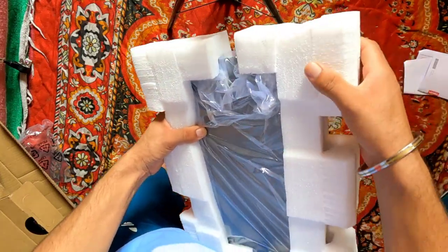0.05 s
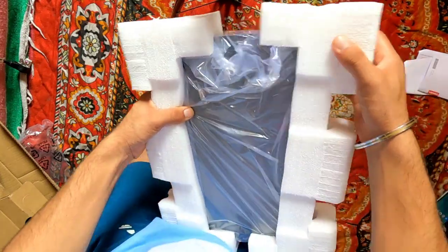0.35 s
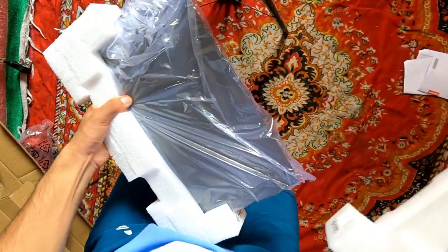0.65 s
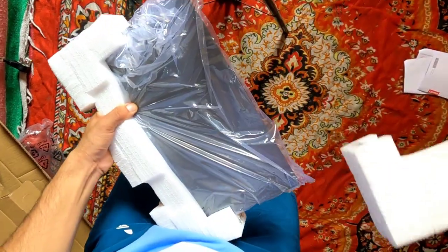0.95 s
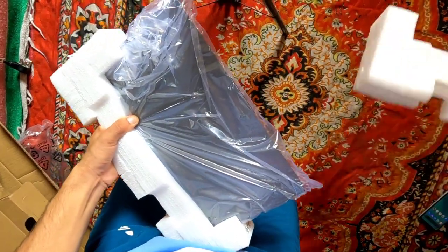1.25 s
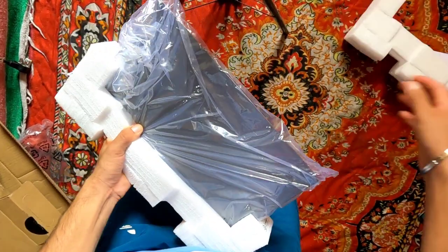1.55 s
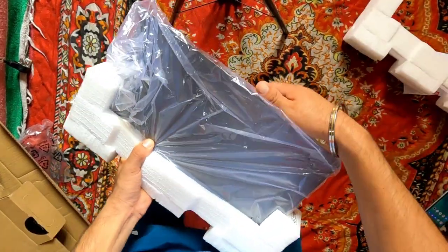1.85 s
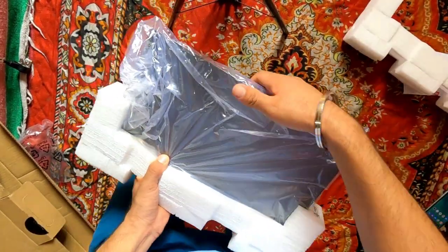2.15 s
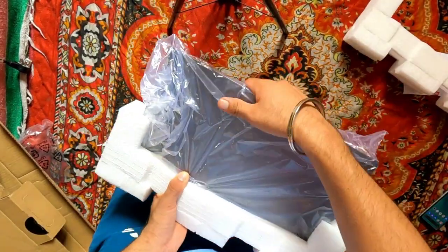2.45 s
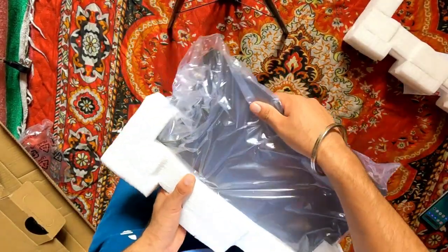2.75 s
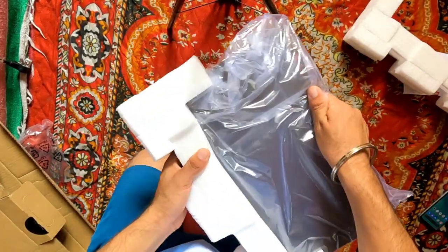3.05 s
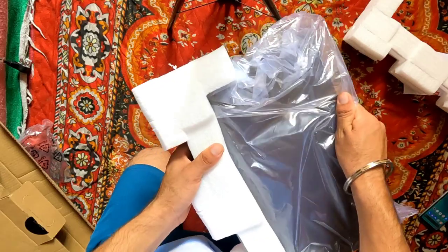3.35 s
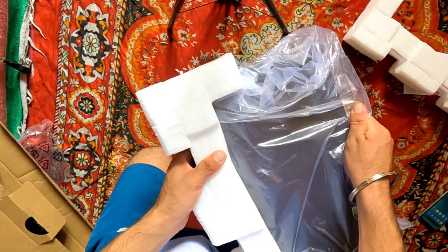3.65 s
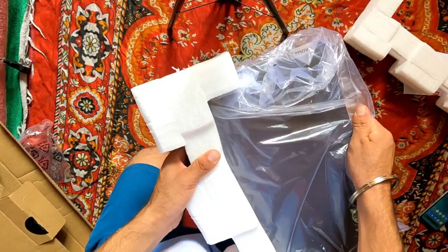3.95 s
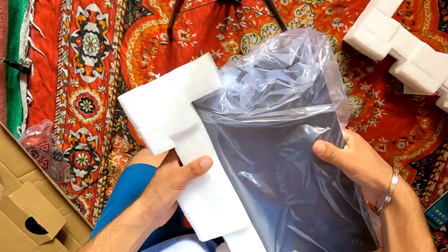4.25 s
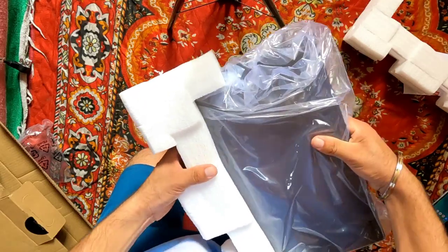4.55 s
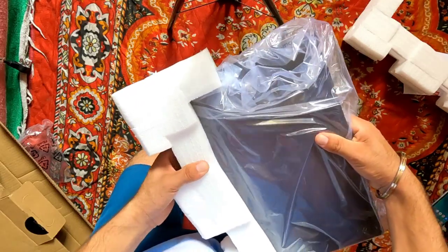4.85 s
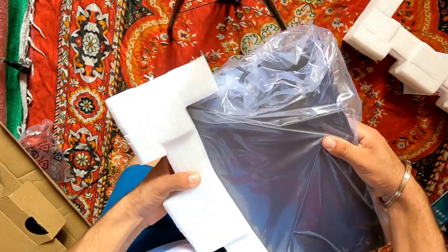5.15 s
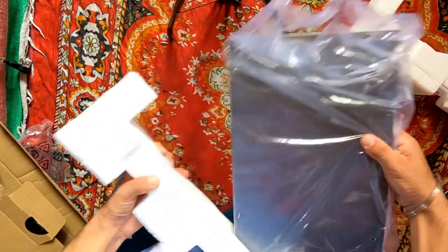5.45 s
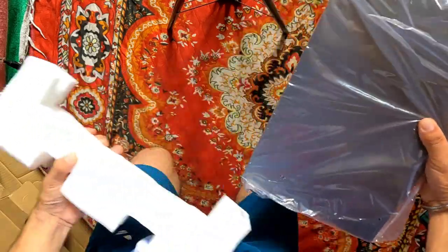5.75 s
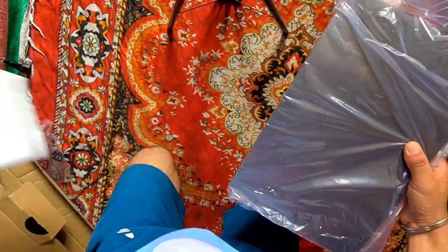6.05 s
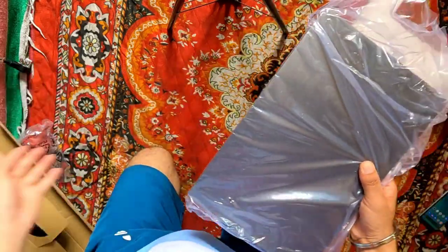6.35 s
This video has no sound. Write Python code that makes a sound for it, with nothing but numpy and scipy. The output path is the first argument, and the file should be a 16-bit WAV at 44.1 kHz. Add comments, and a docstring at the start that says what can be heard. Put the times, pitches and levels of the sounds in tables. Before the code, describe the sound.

A bagged item is worked out of its foam end caps near the microphone, indoors. Rasping foam and a burst of crinkling plastic come first, then the light, hollow thump of one cap falling. Several seconds of uneven tugging follow, with the plastic rustling and its creases popping one by one. The crackle thins, the foam squeaks briefly, and the other cap knocks down. A faint low rumble runs underneath.

```python
"""A flat device in a plastic bag is worked out of its foam end caps, close up in a carpeted room.
Over a faint rumble of moving arms, the foam scrapes and squeaks and the first creases of the film snap.
At 1.6 s one cap drops with a hollow knock. From 2 s the bag is tugged again and again: large creases
buckle one by one over a fine crinkle, then thin out. The foam squeaks as it slides off, and the second
cap lands at 6.45 s, right at the end."""
import sys
import numpy as np
from scipy import signal
from scipy.fft import rfft, irfft
from scipy.io import wavfile

SR = 44100
rng = np.random.default_rng(int(sys.argv[2]) if len(sys.argv) > 2 else 0)


def log_audio(samples):
    """Write samples as a 16-bit WAV file to the path given in sys.argv[1]."""
    # one column per channel
    frames = np.atleast_2d(samples).T
    # limit to full scale, then quantise
    limited = np.clip(frames, -1, 1)
    pcm = np.round(limited * 32767).astype(np.int16)
    wavfile.write(sys.argv[1], SR, pcm)


N = 286914
TIME = np.arange(N) / SR
USUAL_EFFORT_DB = -40  # the film level at which creases come at their usual rate


def amp(db):
    """Decibels to gain."""
    return 10 ** (np.asarray(db) / 20)


def unit(x):
    """Scales to rms 1."""
    return x / np.sqrt(np.mean(x ** 2) + 1e-20)


def read(points, hz):
    """Reads a curve on a log-frequency axis."""
    f, value = np.transpose(points)
    return np.interp(np.log(hz + 1), np.log(f), value)


def follow(rows, column=1):
    """One column of an automation curve at every sample."""
    rows = np.array(rows)
    return np.interp(TIME, rows[:, 0], rows[:, column])


def add(mix, s, sound):
    """Mixes a sound in at s seconds."""
    part = mix[..., max(round(s * SR), 0):][..., :sound.shape[-1]]
    part += sound[..., :part.shape[-1]]


def colour(x, points):
    """Equalises a signal with a curve of f/Hz, gain/dB."""
    return irfft(rfft(x) * amp(read(points, np.fft.rfftfreq(N, 1 / SR))), N)


def wander(hz):
    """Random modulation of rms 1, rolling off above hz."""
    spectrum = rfft(rng.standard_normal(N))
    return unit(irfft(spectrum / (1 + (np.fft.rfftfreq(N, 1 / SR) / hz) ** 4), N))


def causal(gain_db, size):
    """The most compact (minimum-phase) pulse that has this spectrum."""
    cepstrum = irfft(np.log(amp(np.maximum(gain_db, -100))), size)
    cepstrum[1:size // 2] *= 2
    cepstrum[size // 2 + 1:] = 0
    return irfft(np.exp(rfft(cepstrum)), size)


def widen(pair):
    """Blends two unrelated signals into what two close microphone ports hear."""
    # left-right likeness of diffuse sound: f/Hz, coherence/0-1
    coherence = [(50, .95), (300, 0.97), (700, 0.83), (3000, 0.64), (8000, 0.62), (14000, 1)]
    size = pair.shape[-1]
    same = np.clip(read(coherence, np.fft.rfftfreq(size, 1 / SR)), 0, 1)
    mid, side = rfft(pair) * np.sqrt([(1 + same) / 2, (1 - same) / 2])
    return irfft(np.array([mid + side, mid - side]), size)


def noise(points):
    """Coloured stereo noise of rms 1."""
    return unit(colour(widen(rng.standard_normal((2, N))), points))


def background(rumble_db=-2.5, lumps_db=2.5, lumps_hz=6, drone_hz=81, drone_db=-60, waver_db=4.5,
               room_tone_db=-54):
    """Lumpy rumble of moving arms, a wavering low drone that swells now and then, and room tone."""
    # the arms' movement: t/s, level/dB
    arm_motion = [(0, -42.5), (.4, -46), (.8, -43.5), (1.2, -50.5), (1.7, -49), (2.3, -48), (3.3, -51),
                  (3.8, -44.5), (4.1, -52.5), (5, -46.5), (5.85, -51.5), (6, -47), (6.25, -46), (6.5, -36)]
    # spectrum of the rumble: f/Hz, relative level/dB
    rumble_spectrum = [(12, -23), (29, 3), (42, -8), (60, -1.5), (95, -12), (180, -12), (400, -30.5),
                       (1500, -73)]
    # spectrum of the room tone: f/Hz, relative level/dB
    room_tone = [(20, -18), (70, -17), (100, -26), (125, 8.5), (165, -5), (215, 4), (430, -3), (600, -22),
                 (1000, -24), (2200, -48), (5000, -36), (12000, -57)]
    # swells of the drone: middle t/s, half length/s, level/dB
    drone_swells = [(0.274, 0.091, -48), (.78, .08, -48.5), (2.48, 0.036, -46.5), (2.865, 0.099, -45),
                    (4.928, 0.089, -49.5)]
    drone = np.sqrt(2) * np.sin(2 * np.pi * np.cumsum(drone_hz + 3.44 * wander(20.4)) / SR)
    swells = sum(amp(db) / (1 + ((TIME - s) / half) ** 4) for s, half, db in drone_swells)
    rumble = noise(rumble_spectrum) * amp(follow(arm_motion) + rumble_db + lumps_db * wander(lumps_hz))
    drone_gain = np.hypot(swells, amp(drone_db + waver_db * wander(3.6)))
    return rumble + drone * drone_gain + amp(room_tone_db) * noise(room_tone)


def room(x, gap_s=0.0029, build_s=0.0042, size=22050):
    """A few wall echoes over a tail of sparse reflections whose bands die at their own speed."""
    # reverb time: f/Hz, t60/s
    decay = [(100, 3), (250, 1.16), (660, 0.68), (1700, 0.44), (4600, 0.44), (12000, 0.48)]
    # early reflections: delay/s, level/dB
    echoes = [(.0098, -36), (0.012, -13.5), (0.024, -14), (.0245, -30), (.0375, -10), (0.0547, -29)]
    # reverb colour, the carpet soaking up the treble: f/Hz, gain/dB
    reverb_eq = [(100, -10), (260, -4.5), (1500, -3), (5000, -4), (8000, -7.5), (14000, -9.5)]
    taps = rng.choice([-1., 1.], (2, size)) * (rng.random((2, size)) < .12)
    hz, t, bands = signal.stft(taps, SR, nperseg=256)
    bands = bands * amp(-60 * t / read(decay, hz)[:, None])
    tail = signal.istft(bands, SR, nperseg=256)[1][:, :size]
    tail = widen(tail * np.clip((TIME[:size] - gap_s) / build_s, 0, 1))
    tail /= np.linalg.norm(tail[0])
    for s, db in echoes:
        add(tail, s, amp([db]))
    return colour(signal.oaconvolve(x, tail, axes=1)[:, :N], reverb_eq)


def tug(start, length, release, attack_s=.008, attack_share=.2, sag_db_per_s=6):
    """Power envelope of one tug: it builds up, eases as the film gives way, and dies out."""
    t = np.maximum(TIME - start, 0)
    attack = np.minimum(t / (attack_s + attack_share * length), 1)
    return (attack * amp(-sag_db_per_s * t - 60 * np.maximum(t - length, 0) / release)) ** 2


def hands(tug_sliding_share=0.3):
    """Shifting and tugs add up in power: gives film dB, its tilt dB, its sliding share and foam dB."""
    # bag and foam shifting in the hands all the while: t/s, film/dB, treble tilt/dB, foam/dB
    shifting = [(0, -64.5, 0, -45), (.38, -50, -2, -46), (.58, -29.5, 8, -33.5), (.72, -40, 1, -39.5),
                (.87, -46.5, -9, -50), (1.2, -60, -14, -57), (1.58, -55.5, 2, -53.5), (1.9, -53, 0, -52.5),
                (2.05, -43.5, 1.5, -45), (2.52, -43.5, -12, -54), (2.72, -50.5, -5, -51),
                (3.17, -40.5, -1, -47), (3.38, -52.5, -15, -57), (3.85, -46.5, -2, -50.5),
                (4.3, -49, 14, -48.5), (4.6, -44.5, 1, -48), (4.92, -52, -12, -53.5), (5.36, -45, -1, -47),
                (5.7, -39, -20, -38), (5.93, -39, 1.5, -49.5), (6.1, -51.5, -7, -52.5),
                (6.44, -53, -17, -55)]
    # smooth sliding as against crackling while they shift: t/s, share of power/0-1
    sliding_share = [(0, 1), (.5, 0.2), (1, 0.82), (1.8, 0.96), (2.1, 0.36), (4.2, 0), (5.25, 0.63),
                     (5.55, 0.15), (5.9, 0.7), (6.4, 0.9)]
    # tugs, grabs and skids: t/s, length/s, release t60/s, film/dB, treble tilt/dB, foam/dB
    tugs = [(0.011, 0.068, 0.064, -38, 12, -41), (0.44, 0.092, .1, -42.5, -11, -66),
            (0.507, 0.08, 0.061, -22, -2.5, -34), (.695, 0.056, 0.16, -30, 3, -36),
            (1.37, 0.03, 0.13, -56, -22, -49), (1.625, 0.027, 1, -44.5, -7, -35),
            (1.916, 0.087, 0.047, -32, -3, -41), (2.105, 0.039, .1, -43, -21, -47),
            (2.372, .1, 0.41, -35, -2, -41.5), (2.817, 0.026, 0.11, -40, 5, -52),
            (2.991, 0.07, .1, -39, 4, -48), (3.068, 0.022, 0.085, -33, -11, -49),
            (3.564, 0.047, 0.13, -43.5, -2, -53), (3.662, 0.024, 0.066, -39.5, -4, -55),
            (3.757, 0.027, 0.22, -31, 8, -36), (4.055, 0.019, 0.047, -34.5, 1, -62),
            (4.206, .16, 0.62, -32.5, -1, -39), (4.413, .12, 0.14, -35.5, 8, -44),
            (5.06, 0.097, 0.11, -42, -4, -49), (5.178, 0.099, 0.17, -40.5, 0, -45),
            (5.379, 0.13, 0.33, -33.5, -5.5, -38), (5.464, 0.22, 0.35, -30.5, 8, -37.5),
            (6.192, 0.046, 0.11, -44.5, -11, -50), (6.333, 0.02, 0.045, -41, 13, -58)]
    film, foam = amp(follow(shifting)) ** 2, amp(follow(shifting, column=3)) ** 2
    tilt, sliding = film * follow(shifting, column=2), film * follow(sliding_share)
    for start, length, release, film_db, tilt_db, foam_db in tugs:
        envelope = tug(start, length, release)
        pull = envelope * amp(film_db) ** 2
        film += pull
        foam += envelope * amp(foam_db) ** 2
        tilt += pull * tilt_db
        sliding += pull * tug_sliding_share
    return 10 * np.log10(film), tilt / film, np.clip(sliding / film, 0, 1), 10 * np.log10(foam)


def scrape(foam_db, level_db=-0.5, judder_db=2.5, judder_hz=135):
    """Foam cells catch and let go, and the light block radiates the judder as a low rasp."""
    # spectrum of rubbed foam: f/Hz, relative level/dB
    rasp = [(90, -12.5), (170, -3.5), (230, -3), (296, 2), (400, -3), (490, -3), (576, 0), (730, -6.5),
            (950, -3), (1290, -4), (1800, -12.5), (3000, -15), (9000, -21.5)]
    return noise(rasp) * amp(level_db + foam_db + judder_db * wander(judder_hz))


def squeaks(jitter=0.123, roughness=0.76, overtone_db=-14):
    """Foam sticks and slips under the fingers in short runs of unsteady pitch."""
    # the slips: t/s, length/s, level/dB, f/Hz
    slips = [(0.026, 0.024, -30, 1450), (.072, .015, -42, 1463), (0.501, 0.0095, -30, 1495),
             (1.381, 0.041, -52, 1733), (2.126, .02, -40, 1715), (2.437, 0.026, -32.5, 1755),
             (5.83, .13, -44, 1657), (6.043, 0.017, -48, 1274), (6.22, 0.023, -37, 2150),
             (6.223, 0.043, -41.5, 1188), (6.339, 0.028, -42.5, 1646), (6.34, 0.025, -52.5, 3230)]
    out, drift, grip = np.zeros(N), wander(575), wander(127)
    for s, length, db, hz in slips:
        progress = (TIME - s) / length
        on = (progress > 0) & (progress < 2)
        phase = 2 * np.pi * np.cumsum(hz * (1 + jitter * drift[on])) / SR
        tone = np.sin(phase) + amp(overtone_db) * np.sin(2 * phase)
        swell = np.minimum(progress[on] / .15, 1) / (1 + progress[on] ** 8)
        out[on] += amp(db) * swell * (1 + roughness * grip[on]) * tone
    return out


def snap(hz, octaves, flutter=.26, flutter_s=0.0018, skirt=3.8, tick_db=-17, tick_hz=1100,
         stereo_width=0.29, spread_s=0.0003, size=512):
    """A crease flips: a bare tick and a few cycles of ring, then ripples running through the sheet."""
    t, f = np.arange(size) / SR, np.fft.rfftfreq(size, 1 / SR) + 20
    ring = (1 + (np.log2(f / hz) / max(octaves, .15)) ** 2 / skirt) ** -skirt * 2 / (1 + f / hz)
    tick = amp(2 * tick_db) / (1 + (tick_hz / f) ** 4)
    pulse = rfft(causal(10 * np.log10(ring + tick), size))
    ripples = rng.standard_normal((3, size)) * np.exp(-t / flutter_s) * flutter / 2
    paths = ripples[0] + stereo_width * ripples[1:]
    paths[:, 0] = 1  # the direct path
    delay_s = spread_s * np.sqrt(3000 / (f + 200))  # low bending waves cross the sheet later
    dispersion = np.exp(-2j * np.pi * np.cumsum(delay_s) * SR / size)
    sound = irfft(pulse * rfft(paths) * dispersion, size)
    return unit(sound) * np.sqrt(SR / 1000 / size)  # the energy of 1 ms at rms 1


def knocks(size=16384):
    """A dropped cap thumps on the floor, rings hollow and cracks at its edge: gives dry and room send."""
    # blows of the falling caps: t/s, thump level/dB, thump f/Hz, thump t60/s, ring level/dB,
    # crack level/dB, crack f/Hz, crack bandwidth/octaves, room send/dB
    blows = [(1.5991, -25, 276, 0.033, -52, -20.5, 2320, 1, -0.5),
             (1.643, -14.5, 236, 0.036, -27, -20, 1480, 0.61, -2),
             (1.6465, -16, 820, 0.014, -24.5, -15.5, 4500, 0.3, -5),
             (6.4505, -16, 950, 0.017, -33, -22, 1180, 0.37, -5),
             (6.4566, -16, 121, 0.1, -54, -26.5, 4850, 0.38, 5.5),
             (6.4573, -18.5, 457, 0.029, -32, -21, 1180, 0.54, 0.5),
             (6.464, -14.5, 225, 0.11, -35, -26.5, 1380, 0.86, 1.5)]
    # modes of a foam cap: f/Hz, level/dB, t60/s
    cap_modes = [(168, -24, 0.25), (218, 2.5, 0.23), (282.7, 2, 0.15), (313, -7, 0.14), (368.4, 1, 0.13),
                 (445, -11, 0.12), (575, -20, .1), (787, -3, 0.12), (1024, -8, 0.1), (1108, -2, 0.13),
                 (1340, -8, 0.052), (1520, -4, 0.06)]
    t, near, send = np.arange(size) / SR, np.zeros((2, N)), np.zeros((2, N))
    ring = sum(amp(db - 60 * t / t60) * np.sin(2 * np.pi * hz * t) * (-1) ** k
               for k, (hz, db, t60) in enumerate(cap_modes)) / 2
    for s, thump_db, thump_hz, t60, ring_db, crack_db, crack_hz, octaves, send_db in blows:
        thump = amp(thump_db - 60 * t / t60) * np.sin(2 * np.pi * thump_hz * t)
        crack = snap(crack_hz, octaves, flutter=1.0, flutter_s=0.003, tick_db=-19.5)
        blow = np.tile(thump + amp(ring_db) * ring, (2, 1))
        add(blow, 0, amp(crack_db) * crack)
        add(near, s, blow)
        add(send, s, amp(send_db) * blow)
    return near, send


def crinkle(effort_db, tilt_db, sliding, per_s=550, size_db=3.5, largest=2.38, clump_db=1.0,
            level_db=-1, octaves=0.4, hinge_hz=3200, pitches=36):
    """Countless small creases, faster when the film is worked harder, over the hiss of sliding film."""
    # spectrum of sliding film: f/Hz, relative level/dB
    hiss = [(150, -30), (500, -37), (900, 0), (1400, 8), (2400, 5), (4000, 3), (6000, -2), (9000, -2),
            (14000, -5.5)]
    # colour of the small creases: f/Hz, gain/dB
    grain_eq = [(200, 31), (900, -8.5), (1600, 2.0), (2600, -3.0), (5000, 0.0), (12000, -2.5)]
    rate = per_s * amp(.5 * (effort_db - USUAL_EFFORT_DB))
    sizes = amp(size_db * np.minimum(rng.exponential(1, N), largest)) * rng.choice([-1, 1], N)
    fires, pitch_index = rng.random(N) < rate / SR, rng.integers(0, pitches, N)
    clicks = sizes * fires / np.sqrt(rate)  # equal power at any rate
    grains = np.zeros((2, N))
    for k, hz in enumerate(np.geomspace(1200, 7000, pitches)):
        grains += signal.oaconvolve((clicks * (pitch_index == k))[None], snap(hz, octaves), axes=1)[:, :N]
    grains = unit(colour(grains, grain_eq))
    film = np.sqrt(1 - sliding) * grains + np.sqrt(sliding) * noise(hiss)
    # taut film sounds bright, slack film dull, at about equal power
    dull = signal.filtfilt(*signal.butter(1, hinge_hz, fs=SR), film)
    film = (dull + (film - dull) * amp(tilt_db)) / np.sqrt((1 + amp(2 * tilt_db)) / 2)
    return film * amp(level_db + effort_db + clump_db * wander(hz=35))


def creases(effort_db, sliding, per_s=26, lesser_db=-30.5, spread_db=2.0, growth=.6, centre_hz=3100,
            pitch_spread=0.31, lesser_octaves=0.64, right_db=.5, tries=500):
    """Large creases buckle one by one, and lesser ones by chance where film is crushed, not slid."""
    # the large creases: t/s, level over a millisecond/dB, centre f/Hz, bandwidth/octaves
    buckles = [(.4382, -27.5, 3420, 1), (.5247, -22.5, 2100, 1.6), (.6833, -19, 3850, 1),
               (.7123, -18.5, 4000, 0.41), (1.066, -35, 3610, 0.74), (1.0872, -30.5, 2800, 0.79),
               (1.9533, -21.5, 3320, .44), (1.9655, -18, 1930, .34), (2.1714, -27, 1930, .43),
               (2.2943, -26, 2470, 1), (2.4658, -17, 4240, 0.36), (2.5434, -18.5, 3280, 0.89),
               (2.7695, -29.5, 5900, 1.3), (2.8381, -25.5, 3200, .22), (2.8542, -24, 2540, 0.31),
               (2.8587, -20.5, 3460, 1.2), (2.955, -19.5, 4180, 0.87), (3.0771, -21.5, 2920, .87),
               (3.0842, -17, 4200, 0.24), (3.095, -19, 4030, 1.3), (3.1107, -23.5, 3100, 1.4),
               (3.186, -20, 3540, 0.28), (3.2273, -23.5, 3200, .5), (3.303, -23.5, 3820, 1.4),
               (3.358, -21.5, 4560, .94), (3.3807, -22, 2800, 0.43), (3.4199, -21, 3230, 0.86),
               (3.5081, -32, 2720, 0.59), (3.5852, -26.5, 3280, 0.74), (3.709, -24, 3900, 1.3),
               (3.7413, -21, 2940, 1.1), (3.7662, -22, 3200, 1.2), (3.7754, -15, 3840, 1.4),
               (3.799, -20, 2620, 1.06), (3.8602, -18, 3460, 1.6), (3.91, -18.5, 6500, 0.21),
               (3.9129, -22.5, 1610, 1.2), (3.963, -27.5, 2630, .47), (3.9843, -22.5, 4330, 1.6),
               (4.0074, -25.5, 3660, .35), (4.0669, -25.5, 3630, 1.3), (4.0858, -19.5, 7250, 0.24),
               (4.1328, -23, 2240, 0.69), (4.1727, -27.5, 2030, 1.6), (4.2103, -25, 4600, 0.7),
               (4.2333, -21, 4940, 1.4), (4.2671, -18.5, 3100, 1.1), (4.3406, -22, 3250, 0.64),
               (4.397, -16, 5270, .7), (4.5323, -21.5, 4070, 0.7), (4.6, -26, 2780, 1.1),
               (4.7026, -26.5, 3400, 0.99), (4.7391, -26, 3600, 0.47), (4.7659, -24.5, 4170, 0.52),
               (4.8279, -25, 3460, 0.89), (4.8489, -29, 3140, 0.62), (4.9247, -33.5, 2850, 0.7),
               (5.009, -28, 3430, 1.6), (5.0662, -27, 2210, 0.38), (5.1087, -25.5, 3930, 0.45),
               (5.2382, -21, 5300, 1.3), (5.4448, -19, 3120, 0.38), (5.5782, -18.5, 3830, .23),
               (5.6662, -21, 4400, 1.7), (5.7913, -24.5, 1950, 2.4)]
    out = np.zeros((2, N))
    for s, db, hz, octaves in buckles:
        add(out, s, amp(db) * snap(hz, octaves))
    for (place, chance), (size, pitch) in zip(rng.random((tries, 2)), rng.standard_normal((tries, 2))):
        at = int(place * N)
        push_db = growth * (effort_db[at] - USUAL_EFFORT_DB)
        rate = per_s * (1 - sliding[at]) * amp(push_db / 2)
        sound = snap(centre_hz * np.exp(pitch_spread * pitch), lesser_octaves)
        if chance < rate * N / SR / tries:
            add(out, at / SR, amp(lesser_db + push_db + spread_db * size) * sound)
    return out * amp([[-right_db], [right_db]])  # the bag sits a little to the right


def scene(handled_send_db=-7, snap_send_db=-7):
    """Bag and foam in the hands, the dropped caps, and the room round them."""
    effort_db, tilt_db, sliding, foam_db = hands()
    handled = crinkle(effort_db, tilt_db, sliding) + squeaks()
    snaps = creases(effort_db, sliding)
    caps, caps_send = knocks()
    reverb = room(amp(handled_send_db) * handled + amp(snap_send_db) * snaps + caps_send)
    return handled + snaps + scrape(foam_db) + caps + reverb + background()


def record(dry, size=1024, edge_hz=16300):
    """Two close ports, the microphone's dull top, then the band limit."""
    # phase between the ports: f/Hz, lead of the left/rad
    port_phase = [(100, 0.043), (800, 0.13), (2700, 0.63), (6600, 0.51), (16000, 0.93)]
    # microphone response: f/Hz, gain/dB
    microphone_eq = [(20, 1.5), (5000, 0.5), (6700, 0), (8000, -7), (10500, -5.5), (12500, -13),
                     (14500, -24), (16000, -48)]
    lead = read(port_phase, np.fft.rfftfreq(N, 1 / SR)) * np.array([[.5], [-.5]])
    ports = irfft(rfft(dry) * np.exp(1j * lead), N)
    response = causal(read(microphone_eq, np.fft.rfftfreq(size, 1 / SR)), size)
    heard = signal.oaconvolve(ports, response[None], axes=1)[:, :N]
    band_limit = signal.firwin(511, edge_hz, window=("kaiser", 9), fs=SR)
    return signal.oaconvolve(heard, band_limit[None], "same")


dry = scene()
out = record(dry)
log_audio(out)
```